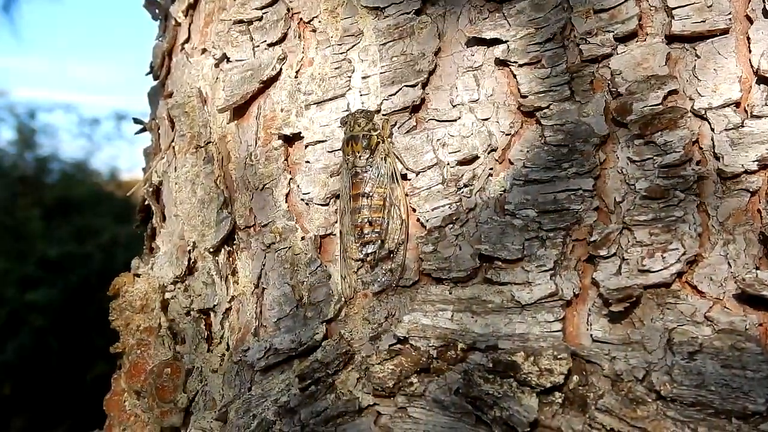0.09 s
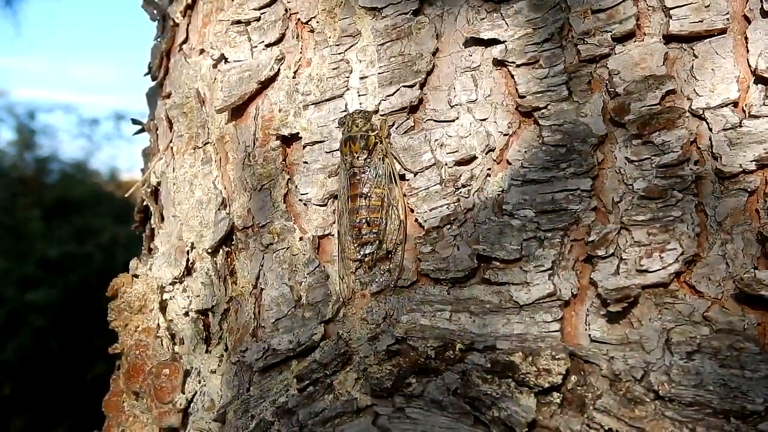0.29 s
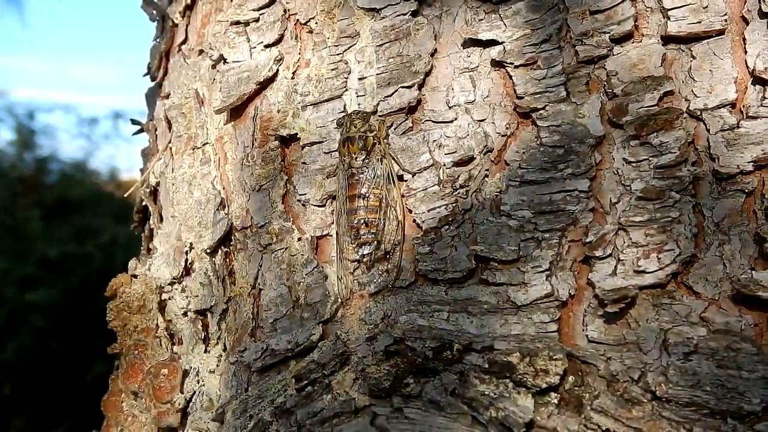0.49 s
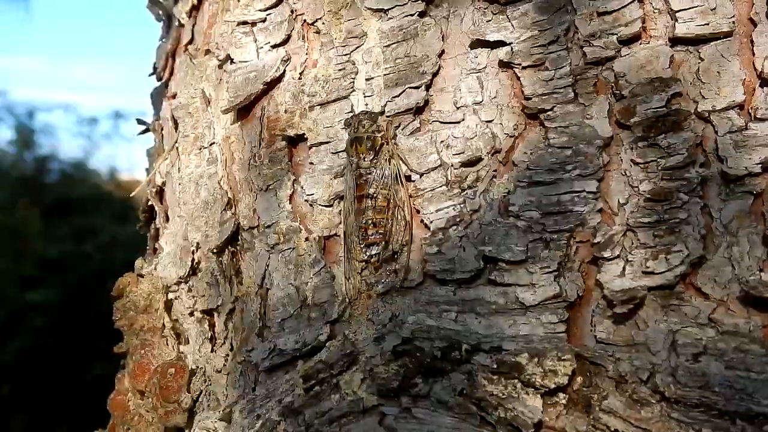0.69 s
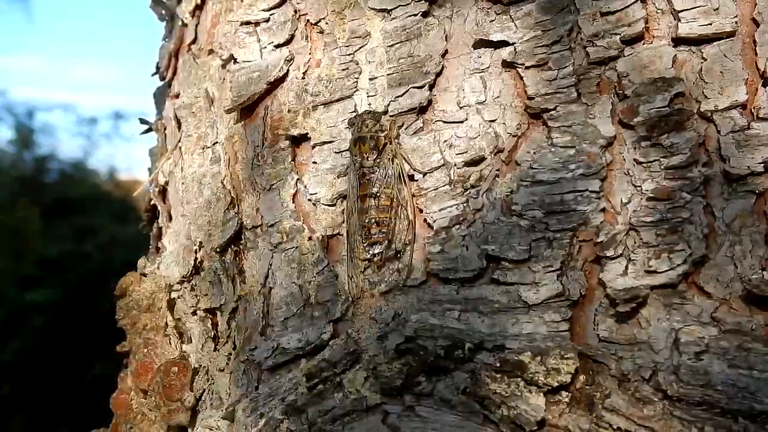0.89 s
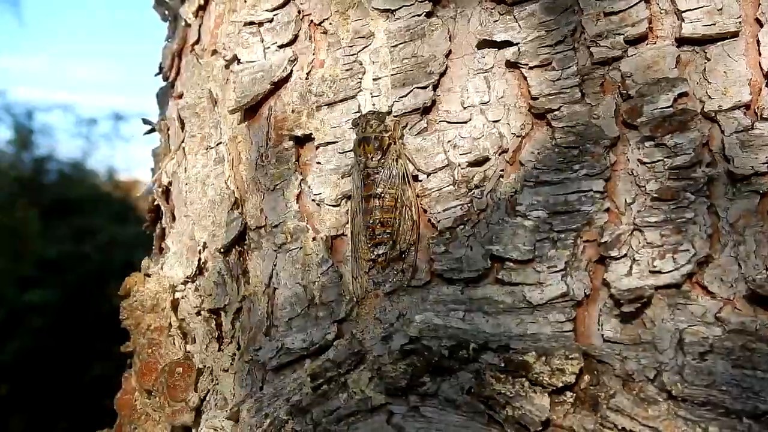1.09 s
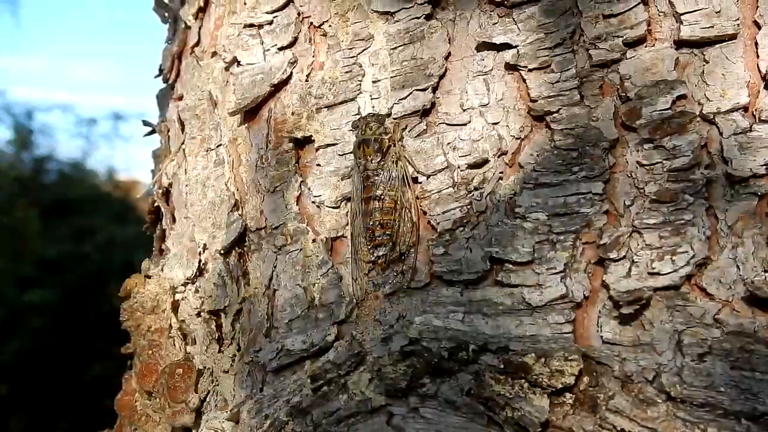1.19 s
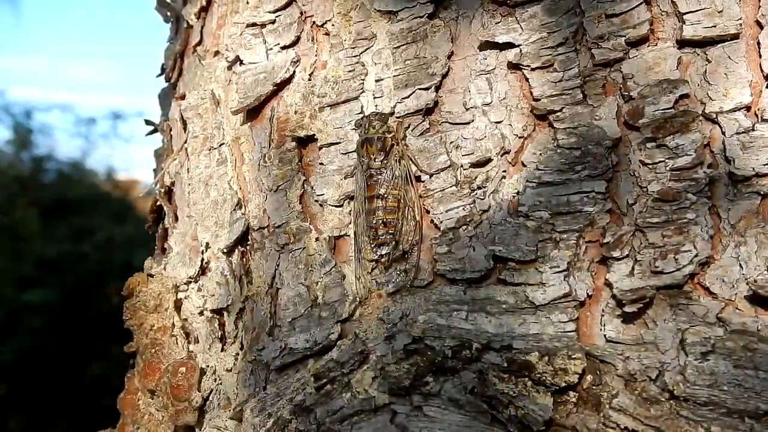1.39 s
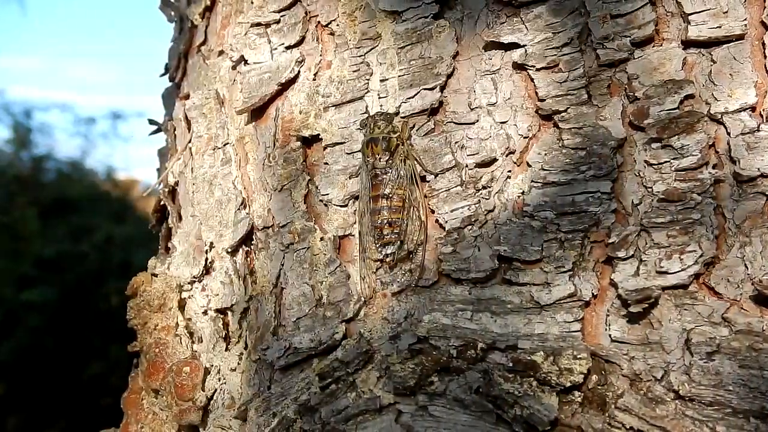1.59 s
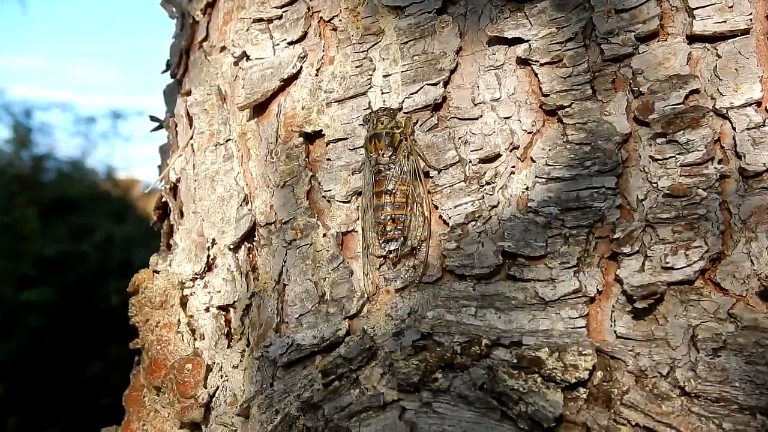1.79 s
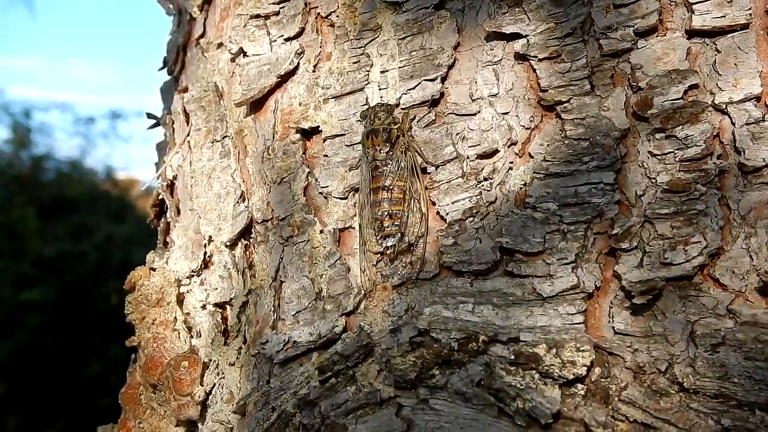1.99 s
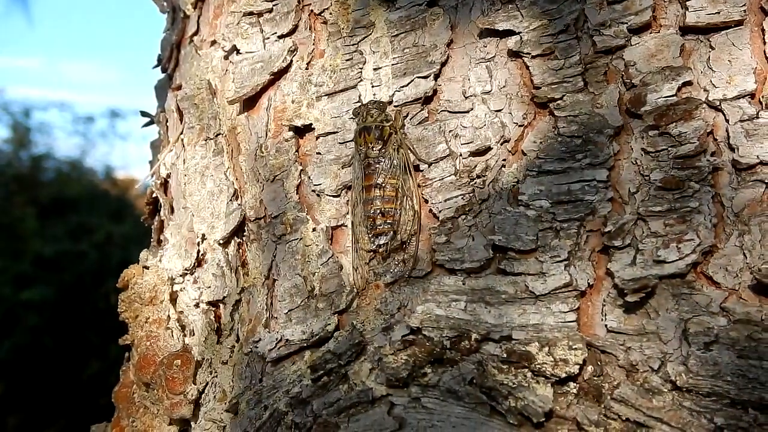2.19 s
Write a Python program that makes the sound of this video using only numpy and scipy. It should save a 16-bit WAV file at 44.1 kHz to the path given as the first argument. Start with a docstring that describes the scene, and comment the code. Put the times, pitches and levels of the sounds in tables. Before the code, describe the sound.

Five nearly identical cicada chirps, dry, bright and raspy, each a tenth of a second of rapid clicks with a brief scattered tail off bark and trees. Quiet outdoor air and very faint low thuds fill the gaps.

```python
"""A cicada sings five nearly even chirps from a tree trunk, close to two microphones.
Each opens with a few lone clicks; then two tymbals buckle in turn, rib after rib, the pitch falling over
four ribs and rising on the fifth. The hollow abdomen rings on. Every rib is a snap with three dying tones.
Bark and trees scatter the song as decaying noise tails; behind it lie soft low bumps, a lumpy rumble and
a faint outdoor haze, all filtered noise. The recorder's gain dips when the sound is loud and creeps back."""
import sys
import numpy as np
from scipy import signal
from scipy.fft import rfft, irfft
from scipy.io import wavfile

SR = 44100
rng = np.random.default_rng(int(sys.argv[2]) if len(sys.argv) > 2 else 0)


def digitize_waveform(pressure):
    """Quantize a signal to 16-bit integers and store it at the path in sys.argv[1].

    Rows of a 2-D input are taken as channels; values are limited to [-1, 1].
    """
    field = np.atleast_2d(pressure).T
    bounded = np.clip(field, -1, 1)
    quanta = np.round(bounded * 32767).astype(np.int16)
    wavfile.write(sys.argv[1], SR, quanta)


N = 97020
TIME = np.arange(N) / SR
SIDES = (.5, -.5)   # left, right: each takes half of a left-minus-right difference


def from_db(db):
    """Decibels to amplitude gain."""
    return 10 ** (np.asarray(db) / 20)


def rms_one(x):
    """Scale to unit power."""
    return x / np.sqrt(np.mean(x ** 2) + 1e-20)


def at_hz(points, hz):
    """Read a table on a log-frequency axis."""
    f, value = np.transpose(points)
    return np.interp(np.log(np.maximum(hz, 1)), np.log(f), value)


def add(out, s, sound):
    """Mix a sound in at a time in seconds, cut off at the end of the output."""
    i = max(int(s * SR), 0)
    part = sound[:max(len(out) - i, 0)]
    out[i:i + len(part)] += part


def bin_hz():
    """Frequencies of a transform padded to 2 N samples."""
    return np.arange(N + 1) * SR / (2 * N)


def colour(x, db):
    """Minimum-phase filter with a given gain per frequency: folding the cepstrum makes it causal."""
    cepstrum = irfft(np.log(from_db(db)))
    cepstrum[1:N] *= 2
    cepstrum[N + 1:] = 0
    response = np.exp(rfft(cepstrum))
    return irfft(rfft(x, 2 * N) * response)[:N]


def ring(hz, t60):
    """A resonance struck once: a cosine that falls 60 dB in t60 seconds."""
    t = TIME[:int(2 * t60 * SR)]
    return np.cos(2 * np.pi * hz * t) * from_db(-60 * t / t60)


RIB_T60_S, OVERTONE_T60_S, LOW_T60_S = .0044, .0059, .0021
LOW_HZ, RIB_RISE_S = 2372, .00015
SNAP_DB = 3   # the dry snap against the rib's ring


def rib_click(hz, overtone_hz, overtone_db, low_db):
    """A rib buckles: a dry snap, then its pitch, an overtone and a low tone ring briefly."""
    click = np.zeros(SR // 50)
    add(click, 0, ring(hz, RIB_T60_S))
    add(click, 0, from_db(overtone_db) * ring(overtone_hz, OVERTONE_T60_S))
    add(click, 0, from_db(low_db) * ring(LOW_HZ, LOW_T60_S))
    click *= 1 - np.exp(-TIME[:len(click)] / RIB_RISE_S)
    click[0] += from_db(SNAP_DB)   # one-sample impulse
    return click


OPENING_HZ, OPENING_OVERTONE_DB, OPENING_LOW_DB = 4760, -20, -10


def opening_clicks(out, overtone_hz):
    """Lone rib clicks as the tymbals take up tension."""
    # the clicks before the strokes: (earliest t/s after the chirp's start, relative level/dB)
    opening = [(.0002, -11.5), (.0036, -5.5), (.0048, -12), (.0059, -8.5), (.0095, -12), (.0107, -15.5),
               (.0139, -11), (.0160, -8)]
    for s, db in opening:
        click = rib_click(OPENING_HZ, overtone_hz, OPENING_OVERTONE_DB, OPENING_LOW_DB)
        late_s = 2 * RIB_JITTER_S * rng.random()
        add(out, s + late_s, from_db(db) * click)


STROKE_S, SECOND_LAG_S = .01215, .0067   # period of each tymbal, lag of the second behind the first
SECOND_DB = -1   # the second tymbal is a little weaker
SWELL_S, SWELL_DB = .026, 4.5   # the strokes grow to full strength
BRIGHTEN = 1   # dB of overtone per dB of effort
# standard deviations of the random draws; detuning is a fraction of the pitch
RIB_JITTER_S, RIB_SPREAD_DB, RIB_DETUNE, STROKE_JITTER_S = .00007, .8, .026, .00024
SONG_DB = -6.5
ABDOMEN_HZ, ABDOMEN_T60_S, ABDOMEN_RISE_S = 4890, .042, .002


def chirp(first_s, length_s, ring_db):
    """Lone clicks, alternating strokes of the two tymbals, and the abdomen's after-ring."""
    # ribs in one stroke, buckling inward and springing back, before random variation:
    # (pitch f/Hz, relative level/dB, overtone f/Hz, overtone level/dB at full effort, low tone level/dB)
    ribs = [(5403, -2.5, 5600, -13, -19.5), (4936, 0.5, 6400, -5.5, -15), (4560, -0.5, 7100, -3.5, -4),
            (4258, -1, 6800, -5, -3), (5070, -4, 3200, -11, -12.5)]
    # nominal rib times after the stroke's start: (t/s)
    rib_times = [-.0004, .0011, .0021, .0031, .0044]
    out = np.zeros(SR // 4)
    opening_clicks(out, ribs[2][2])

    chance = rng.standard_normal((16, len(ribs), 4))   # stroke, rib, (late, loud, sharp, stroke late)
    for k, draws in enumerate(chance):
        pair, tymbal = divmod(k, 2)
        since = pair * STROKE_S + tymbal * SECOND_LAG_S
        if first_s + since + STROKE_S / 4 > length_s:
            break
        start = first_s + since + STROKE_JITTER_S * draws[0, -1]
        effort_db = tymbal * SECOND_DB - SWELL_DB * max(1 - since / SWELL_S, 0)
        for s, rib, (late, loud, sharp, _) in zip(rib_times, ribs, draws):
            hz, db, overtone_hz, overtone_db, low_db = rib
            tune = 1 + RIB_DETUNE * sharp
            bright_db = overtone_db + BRIGHTEN * effort_db
            click = rib_click(hz * tune, overtone_hz * tune, bright_db, low_db)
            gain = from_db(effort_db + db + RIB_SPREAD_DB * loud)
            add(out, start + s + RIB_JITTER_S * late, gain * click)

    after = ring(ABDOMEN_HZ, ABDOMEN_T60_S)
    after *= np.minimum(TIME[:len(after)] / ABDOMEN_RISE_S, 1)
    # SONG_DB is taken off here because the whole chirp gets it later
    add(out, length_s - ABDOMEN_RISE_S, from_db(ring_db - SONG_DB) * after)
    return out


def cicada():
    """The chirps, coloured by the abdomen, with a level and phase difference between microphones."""
    # chirps: (start t/s, delay of the first stroke t/s, length up to the after-ring t/s)
    chirp_times = [(.2102, .0176, .0925), (.6092, .0195, .0870), (1.0260, .0186, .0935),
                   (1.4209, .0183, .0850), (1.8144, .0187, .0920)]
    # the same chirps: (level of the whole chirp/dB, after-ring level within it/dB, without SONG_DB)
    chirp_levels = [(-1, -29.5), (-0.5, -42), (-0.5, -30), (0, -16), (-1.5, -39.5)]
    # colour of the abdomen: (f/Hz, gain/dB)
    body = [(60, -16.5), (200, -7), (500, -12.5), (900, -16), (1400, -25.5), (1650, -15.5), (1950, -6),
            (2280, -0.5), (2500, -12), (2750, 1.5), (2980, -5.5), (3250, -17.5), (3600, -21.5),
            (3950, -10.5), (4300, 2.5), (4750, -1), (5200, 4.5), (5550, 1), (5900, -0.5), (6500, -7.5),
            (7300, -11.5), (8200, -21.5), (9000, -34.5), (10200, -33.5), (11500, -45), (15500, -47)]
    # at the two microphones: (f/Hz, left minus right/dB)
    balance = [(100, -8.5), (400, -15.5), (1200, -8), (2000, -2.5), (2800, -6), (3500, -14.5), (4100, 2.5),
               (5000, 3), (6500, 6.5), (7200, 4.5), (7800, 18), (8600, 24), (9500, -4.5), (15000, 4.5)]
    # phase by which the left leads: (f/Hz, phase/rad)
    lead = [(100, 0.27), (3700, 0), (4200, 0.96), (5000, 0.74), (7500, 1.4)]
    song, hz = np.zeros(N), bin_hz()
    for (s, first_s, length_s), (db, ring_db) in zip(chirp_times, chirp_levels):
        add(song, s, from_db(SONG_DB + db) * chirp(first_s, length_s, ring_db))
    spectrum = rfft(colour(song, at_hz(body, hz)), 2 * N)
    channels = []
    for side in SIDES:
        gain = from_db(side * at_hz(balance, hz))
        turn = np.exp(1j * side * at_hz(lead, hz))
        channels.append(irfft(spectrum * gain * turn)[:N])
    return np.array(channels)


def scatter(x, db, t60):
    """Diffuse reflections: a dying noise tail from 2 ms on, different on each side."""
    tail = rng.standard_normal((2, N)) * from_db(-60 * TIME / t60) * (TIME > .002)
    tail /= np.sqrt(np.sum(tail ** 2, axis=1, keepdims=True))   # unit energy
    return from_db(db) * signal.fftconvolve(x, tail, axes=1)[:, :N]


NEAR_DB, NEAR_T60_S = -21.5, .072   # scatter from the bark nearby
ECHO_DB, ECHO_T60_S = -46, .5   # scatter from the trees around


def reflections(song):
    """Bark and trees colour the song and smear it in time."""
    # colour of the reflections: (f/Hz, gain/dB)
    tint = [(1500, 2), (2250, 2), (2500, 5.5), (2800, -3.5), (3400, 6), (4300, -2.5), (5000, 2.5),
            (7000, 0.5)]
    spread = np.array([colour(channel, at_hz(tint, bin_hz())) for channel in song])
    return scatter(spread, NEAR_DB, NEAR_T60_S) + scatter(spread, ECHO_DB, ECHO_T60_S)


BUMP_RISE_S, BUMP_T60_S = .001, .064
BUMP_WIDTH = 1.6   # band edges as a ratio to the centre
BUMP_PAN_DB = -11.5   # left minus right


def bumps():
    """Soft low bumps: short puffs of band-passed noise, each microphone with its own."""
    # bumps: (t/s, level midway between the sides/dB, band centre f/Hz)
    bump_list = [(.068, -56, 150), (.425, -49, 200), (0.471, -56, 189.6), (0.503, -56.5, 194),
                 (.714, -46.5, 150), (1.141, -61.5, 169), (1.294, -56, 199), (1.83, -44.5, 160)]
    out, t = np.zeros((2, N)), TIME[:SR // 4]
    shape = np.minimum(t / BUMP_RISE_S, 1) * from_db(-60 * t / BUMP_T60_S)
    for s, db, hz in bump_list:
        edges = [hz / BUMP_WIDTH, hz * BUMP_WIDTH]
        band = signal.butter(2, edges, "band", fs=SR, output="sos")
        for channel, side in zip(out, SIDES):
            noise = rng.standard_normal(2 * len(t))
            puff = rms_one(signal.sosfilt(band, noise))[len(t):]   # skip the filter's start
            add(channel, s, from_db(db + side * BUMP_PAN_DB) * shape * puff)
    return out


RUMBLE_LOW_HZ, RUMBLE_HIGH_HZ, RUMBLE_LUMPS_DB = 110, 254, 4.5


def rumble():
    """Lumpy low band-passed noise, separate in each microphone, swelling together."""
    # the rumble's level before the random lumps: (t/s, level/dB)
    rumble_level = [(0, -78), (.15, -66), (.33, -75), (.45, -64), (.58, -65), (.75, -69), (.85, -80),
                    (1.0, -67.5), (1.2, -66), (1.3, -62.5), (1.42, -65), (1.55, -65), (1.68, -76),
                    (1.85, -73.5), (2.05, -82), (2.2, -73)]
    band = signal.butter(2, [RUMBLE_LOW_HZ, RUMBLE_HIGH_HZ], "band", fs=SR, output="sos")
    noise = rms_one(signal.sosfilt(band, rng.standard_normal((2, 2 * N)))[:, N:])
    lumps = np.interp(TIME, np.linspace(0, TIME[-1], 70), rng.standard_normal(70))
    level_db = np.interp(TIME, *np.transpose(rumble_level)) + RUMBLE_LUMPS_DB * lumps
    return from_db(level_db) * noise


HAZE_DB = -64.5


def haze():
    """Distant outdoor noise, swelling and sinking; shared noise sets how alike the sides are."""
    # colour of the haze: (f/Hz, relative level/dB)
    haze_colour = [(25, -28.5), (55, -16), (100, -9.5), (160, -3), (230, -4), (400, -9), (650, -4.5),
                   (1050, -8.5), (1600, -14), (2080, -17.5), (2470, -25.5), (2800, -21.5), (3300, -29.5),
                   (3800, -32.5), (4400, -24), (5000, -20.5), (5900, -25.5), (6500, -34.5), (8500, -39.5),
                   (11000, -46), (15500, -48)]
    # left-right likeness, held within 0 to 1 below: (f/Hz, correlation)
    likeness = [(60, -0.55), (200, 0.67), (700, 1.04), (2000, 0.64), (5000, 0.3), (12000, 3.4)]
    # (f/Hz, left minus right/dB)
    haze_balance = [(50, -0.5), (200, -1), (700, -2), (2000, -5.5), (5000, 0), (12000, 3.5)]
    # swell around HAZE_DB: (t/s, relative level/dB)
    haze_swell = [(0, -4), (.18, 0), (.4, -4), (.58, -0.5), (.85, -3.5), (1.0, 0.5), (1.3, 0), (1.65, -1.5),
                  (1.8, 1.5), (2.0, -4), (2.2, -0.5)]
    hz = bin_hz()
    alike = np.clip(at_hz(likeness, hz), 0, 1)
    mid, wide = rfft(rng.standard_normal((2, 2 * N)))
    channels = []
    for side in SIDES:
        noise = np.sqrt(1 + alike) * mid + np.sign(side) * np.sqrt(1 - alike) * wide
        gain = from_db(at_hz(haze_colour, hz) + side * at_hz(haze_balance, hz))
        channels.append(irfft(noise * gain)[:N])
    level_db = HAZE_DB + np.interp(TIME, *np.transpose(haze_swell))
    return from_db(level_db) * rms_one(np.array(channels))


def scene():
    """The cicada, its reflections and the background."""
    song = cicada()
    return song + reflections(song) + bumps() + rumble() + haze()


LIMIT_DB, RECOVER_DB_PER_S, DETECT_S = -18, 4.5, .0058   # threshold, recovery, detector time
CUTOFF_HZ = 15700   # 70 dB down from here up


def record(dry):
    """Gain control ducks quickly and recovers slowly; the top is cut."""
    r = np.exp(-1 / (DETECT_S * SR))
    power = signal.lfilter([1 - r], [1, -r], np.mean(dry ** 2, axis=0))
    over_db = np.maximum(10 * np.log10(power + 1e-12) - LIMIT_DB, 0)
    # a running peak that sinks at the recovery rate
    recovered_db = RECOVER_DB_PER_S * TIME
    duck_db = np.maximum.accumulate(over_db + recovered_db) - recovered_db
    low_pass = signal.cheby2(12, 70, CUTOFF_HZ, fs=SR, output="sos")
    return signal.sosfilt(low_pass, dry * from_db(-duck_db))


dry = scene()
out = record(dry)
digitize_waveform(out)
```